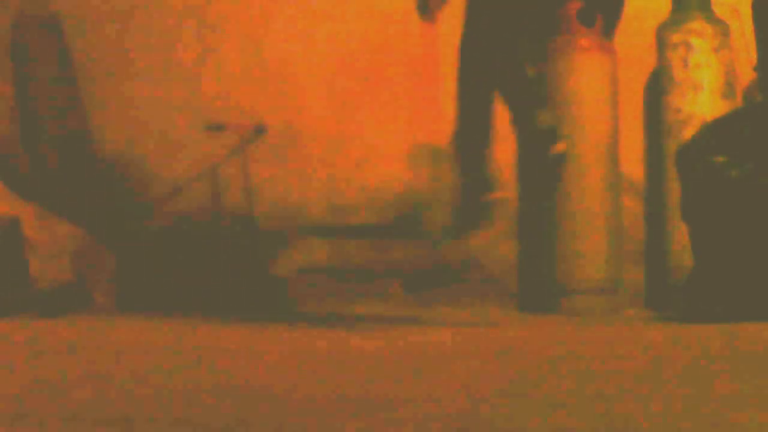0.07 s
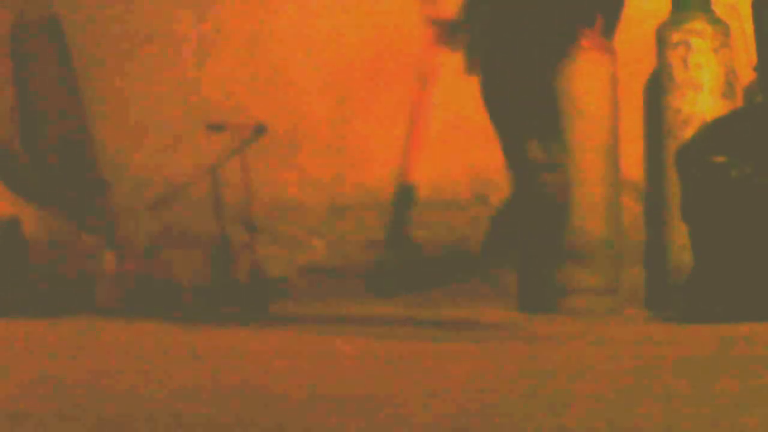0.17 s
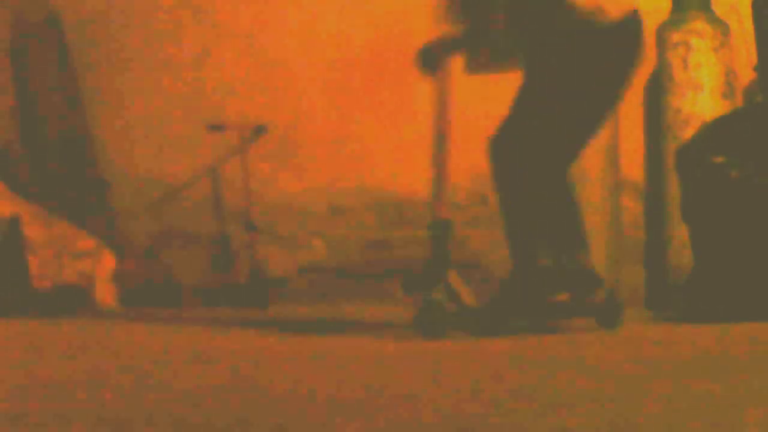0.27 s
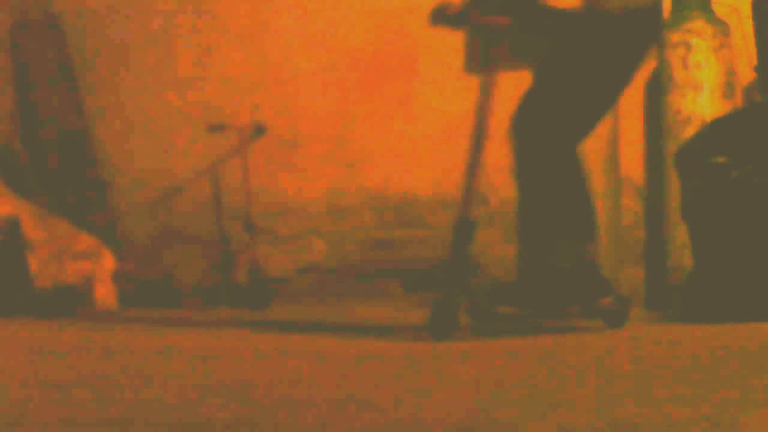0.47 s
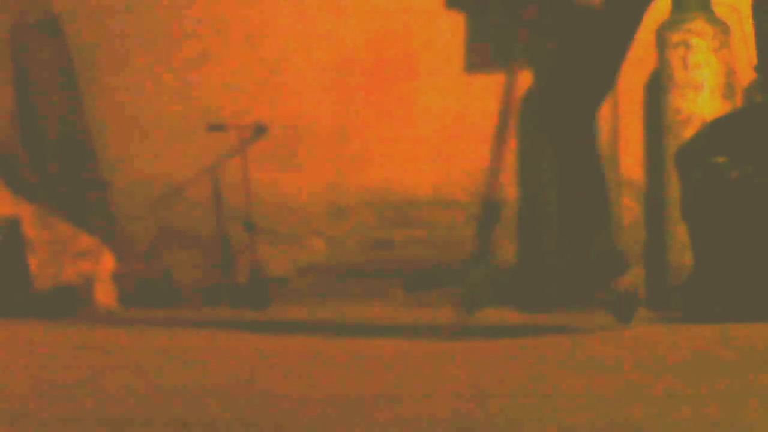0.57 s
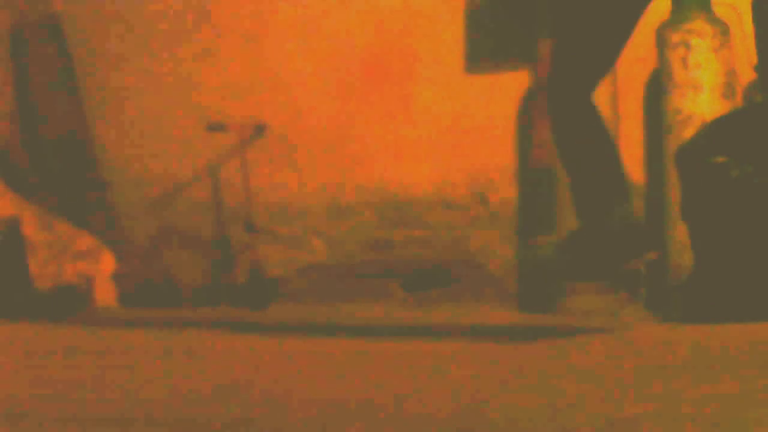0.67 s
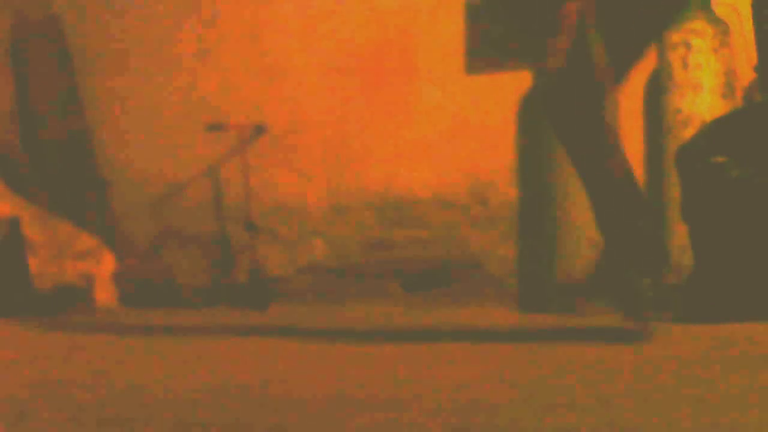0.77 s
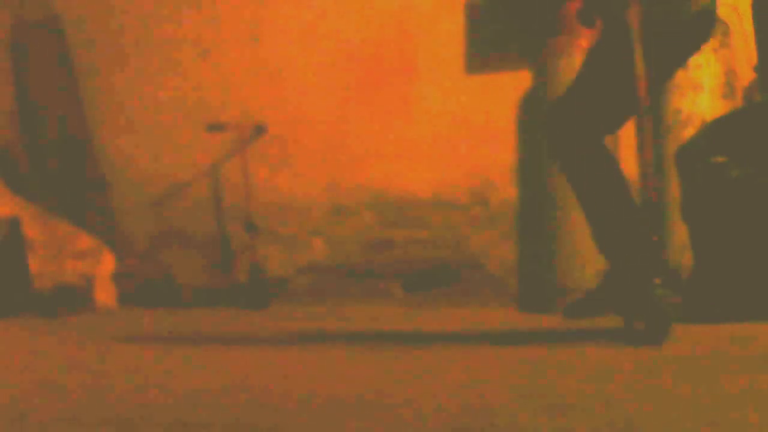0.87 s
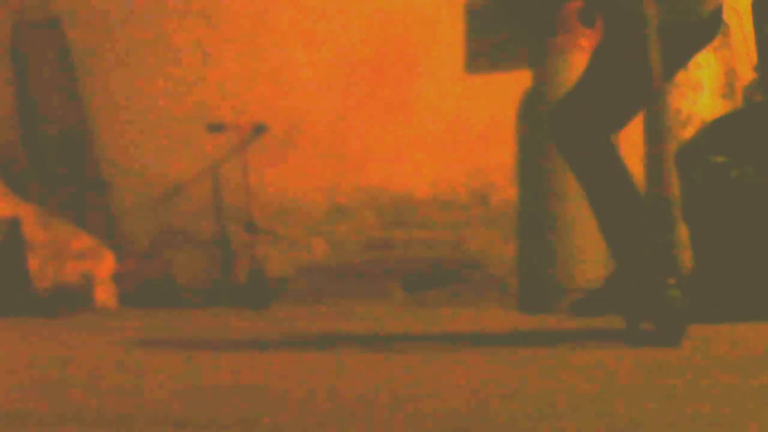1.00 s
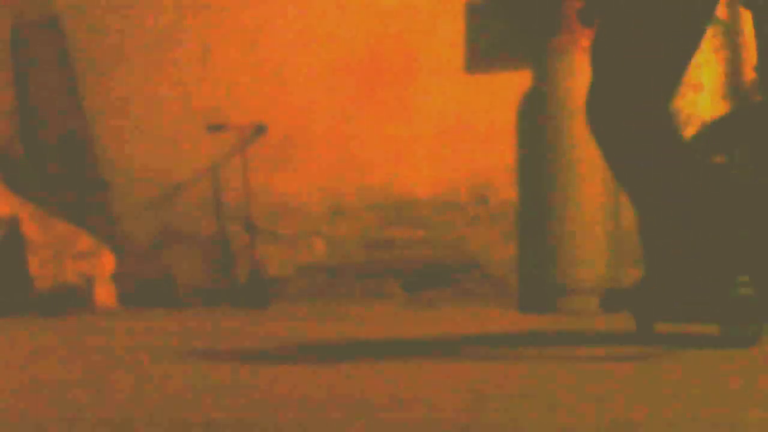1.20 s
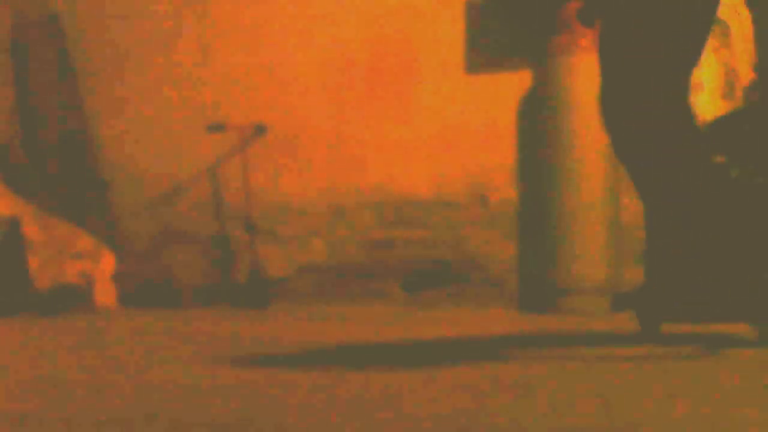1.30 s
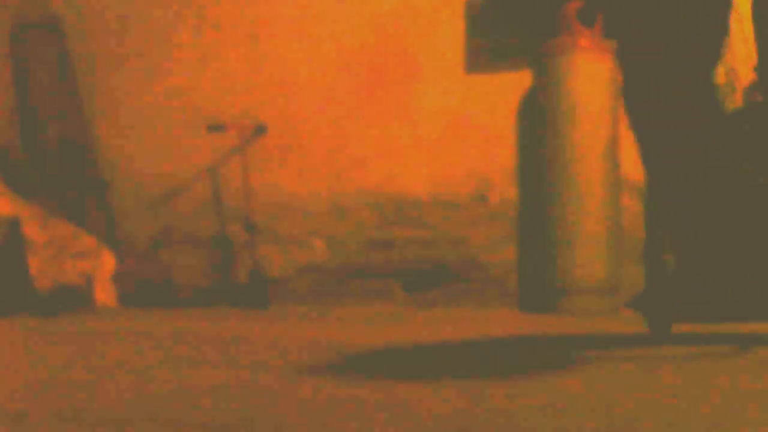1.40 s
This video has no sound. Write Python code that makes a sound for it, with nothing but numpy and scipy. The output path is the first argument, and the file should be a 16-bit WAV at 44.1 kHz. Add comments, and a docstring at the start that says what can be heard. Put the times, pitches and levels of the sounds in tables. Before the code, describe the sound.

Sharp smack of a scooter landing outdoors, followed by a dull thud and faint rolling.

```python
"""Kick scooter landing between walls

One wheel touches hard ground, then the deck slams down with a crack; half a second later comes a duller
thud. The impacts excite the scooter's damped modes, reverberate between the walls and leave a low boom.
The wheels roll on quietly. A hissy, narrow-band microphone overloads and clips on the crack."""
import sys
import numpy as np
from scipy import signal
from scipy.fft import rfft, irfft, next_fast_len
from scipy.io import wavfile
from scipy.ndimage import uniform_filter1d, map_coordinates

SR = 44100
rng = np.random.default_rng(int(sys.argv[2]) if len(sys.argv) > 2 else 0)


def persist_wave(psi):
    """Save psi, clipped to +-1, as 16-bit WAV."""
    counts = np.round(np.clip(psi, -1, 1) * 32767).astype(np.int16)
    wavfile.write(sys.argv[1], SR, np.atleast_2d(counts).T)


N = 63945
T = np.arange(N) / SR

# hard strikes and one quick echo of the main crack (at 0.248 s): t/s, level/dB, cutoff f/Hz
STRIKES_AND_ECHO = [(.2063, -15, 650), (0.2381, 0.5, 3980), (0.2396, -6.5, 1146), (.2478, -8.5, 880),
                    (.3758, -16, 850)]
# spectrum of a crack: f/Hz, relative level/dB
CRACK_SPECTRUM = [(60, -11.5), (200, -7), (700, 6), (1500, -7.5), (2450, 2.5), (3300, -24.5), (4300, -15.5),
                  (5550, -33), (6700, -24.5), (8200, -21.5)]
# heavily damped modes of wheel and deck: f/Hz, level/dB, T60/s
SMACK_MODES = [(334, -6.5, 0.021), (619, -5.5, 0.017), (913, -11, 0.035), (1883, -22.5, 0.015),
               (2260, -15.5, 0.0064)]
def cracks():
    """Impact radiation: each strike, and one quick echo, is a pulse, a damped smack and grit noise."""
    pulse_db, grit_db = -4, -17.5
    out = np.zeros(N)
    for start, db, cutoff in STRIKES_AND_ECHO:
        pulse = amp(pulse_db) * pressure_pulse(CRACK_SPECTRUM, cutoff)
        smack = sum(amp(level) * lowpass(hz, cutoff) * sine(hz) * decay(t60)
                    for hz, level, t60 in SMACK_MODES)
        grit = amp(grit_db) * steadied(noise(CRACK_SPECTRUM, cutoff), size=130) * decay(t60=0.012)
        out += at(start, amp(db) * (pulse + smack * rise(attack_s=0.0006) + grit))
    return out


# wheel and deck contacts: t/s, level/dB, cutoff f/Hz
LANDING_CONTACTS = [(0.2037, -25.5, 1700), (0.2376, -13, 3340), (.374, -33.5, 1000)]
# spectrum of their reverberation: f/Hz, relative level/dB
KNOCK_SPECTRUM = [(30, -19.5), (70, -11.5), (140, -4), (340, -3.5), (560, -5), (880, -11), (1200, -11.5),
                  (1750, -23.5), (2550, -26), (3200, -37), (7000, -38.5)]
def knocks():
    """Impulse response: touch, slam and rebound each excite the wall echoes and the scooter's modes."""
    ring_db = -4.5
    out = np.zeros(N)
    for start, db, cutoff in LANDING_CONTACTS:
        echo = reverberation(KNOCK_SPECTRUM, cutoff)
        ring = amp(ring_db) * ringing("knock", cutoff)
        out += at(start, amp(db) * (echo + ring))
    return out


# soft, heavy blows: t/s, echo level/dB, direct peak level/dB, cutoff f/Hz
SOFT_CONTACTS = [(0.7542, -28.5, -58, 450), (0.7628, -30.5, -16, 2200), (0.7711, -30.5, -11.5, 1300),
                 (.868, -42, -37.5, 730), (.917, -47, -38.5, 600)]
# spectrum of a thud: f/Hz, relative level/dB
THUD_SPECTRUM = [(30, -22), (90, 3.5), (130, -5), (200, -5.5), (290, -9.5), (370, -8), (500, -4),
                 (620, -16.5), (1050, -15.5), (1350, -26.5), (1700, -23.5), (2100, -45.5), (6000, -39)]
def thuds():
    """Temporal fusion: three close, soft contacts are heard as one thud; two faint bumps follow."""
    ring_start_s, ring_db = 0.766, -24.5  # the frame rings once the full weight is down
    out = np.zeros(N)
    for start, echo_db, direct_db, cutoff in SOFT_CONTACTS:
        echo = amp(echo_db) * reverberation(THUD_SPECTRUM, cutoff)
        direct = amp(direct_db) * pressure_pulse(THUD_SPECTRUM, cutoff)
        out += at(start, echo + direct)
    return out + at(ring_start_s, amp(ring_db) * ringing("thud"))


# the weight coming down: t/s, level/dB, f/Hz
WEIGHT_PUSHES = [(0.234, -12.5, 115.7), (0.7535, -20.5, 127)]
def pushes():
    """Damped oscillation: each heavy blow gives a low push that dies within a few cycles."""
    return sum(at(start, -amp(db) * sine(hz) * decay(t60=0.063)) for start, db, hz in WEIGHT_PUSHES)


# modes of scooter and ground: f/Hz, level in a knock/dB, level in a thud/dB, T60/s
SCOOTER_MODES = [(99, -26, -5, 1.32), (139, -4.5, -32.5, 0.17), (169.3, -2.5, -12.5, 0.53),
                 (205.6, -7, -10.5, 0.62), (247, -4, -20, 0.27), (280, -15, -13, 1.67),
                 (300, -11.5, 1, 0.29), (349, 1.5, -12, 0.38), (367.7, -20, -26.5, 1.85),
                 (441.6, -5, -12, 0.24), (501.7, -7.5, -11.5, 0.49), (534, 0.5, -8, 0.35),
                 (584, -9.5, -26, 0.15), (642.7, -10, -12.5, 0.53)]
def ringing(blow, cutoff=np.inf):
    """Modal superposition: the kind of blow weights each decaying mode; level and phase waver."""
    waver_db, waver_hz, waver_rad = 3.5, 8.7, 0.5
    out = np.zeros(N)
    for hz, knock_db, thud_db, t60 in SCOOTER_MODES:
        db = knock_db if blow == "knock" else thud_db
        gain = amp(db + waver_db * wobble(waver_hz)) * lowpass(hz, cutoff)
        phase = rng.uniform(0, 2 * np.pi) + waver_rad * wobble(waver_hz)
        out += gain * decay(t60) * sine(hz, phase)
    return out * rise(attack_s=0.0023)


# reverberation time between the walls: f/Hz, T60/s
WALL_DECAY = [(50, 1.5), (160, .7), (420, 0.44), (1100, 0.43), (2900, 0.33), (7000, .3)]
def reverberation(spectrum, cutoff):
    """Diffuse field: dense reflections merge into decaying noise in which the bass lasts longest."""
    reflections = steadied(noise(spectrum, cutoff), size=1100)
    hz, t, bands = signal.stft(reflections, SR, nperseg=512)
    absorption = np.exp(-np.log(1000) * t / along(WALL_DECAY, hz)[:, None])
    _, tail = signal.istft(bands * absorption, SR, nperseg=512)
    return tail[:N] * rise(attack_s=0.00076)


# onsets of the boom: t/s, level/dB
BOOM_ONSETS = [(0.24, -31.5), (0.755, -38)]
def booms():
    """Standing wave: each heavy blow excites a low mode of the air between the walls."""
    boom = sine(hz=37) * decay(t60=1.5) * rise(attack_s=0.025)
    return sum(at(start, amp(db) * boom) for start, db in BOOM_ONSETS)


# envelope of the rolling: t/s, level/dB
ROLL_ENVELOPE = [(0, -42), (.2, -37), (.3, -49.5), (.55, -35.5), (.7, -38), (.93, -31), (.99, -50),
                 (1.17, -50.5), (1.29, -35), (1.38, -50), (1.45, -36.5)]
# spectrum of the wheels: f/Hz, relative level/dB
ROLL_SPECTRUM = [(25, 17), (50, -1), (90, -5), (140, -1.5), (200, -17), (290, -9), (360, -11.5),
                 (470, -8.5), (700, -20), (1200, -27), (3000, -42)]
def rolling():
    """Roughness excitation: small wheels rumble unevenly over the ground."""
    rough_db = 1
    rumble = noise(ROLL_SPECTRUM)
    level_db = np.interp(T, *np.transpose(ROLL_ENVELOPE))
    return rumble * amp(level_db + rough_db * wobble(rate_hz=21.1))


# spectrum of the distant background: f/Hz, relative level/dB
AMBIENT_SPECTRUM = [(25, 14.5), (60, -16.5), (105, 2.5), (150, -4), (300, 2.5), (480, -7.5), (650, -7),
                    (850, -15.5), (1300, -16.5), (3000, -41)]
def background():
    """Ambient noise: a faint, stationary floor, strongest in the bass."""
    return amp(db=-50.5) * noise(AMBIENT_SPECTRUM)


def pressure_pulse(spectrum, cutoff, size=4096):
    """Minimum phase: folding the cepstrum packs the energy at the onset of a pulse of peak 1."""
    hz = np.fft.rfftfreq(size, 1 / SR)
    magnitude = amp(along(spectrum, hz)) * lowpass(hz, cutoff)
    cepstrum = irfft(np.log(magnitude))
    folded = 2 * cepstrum * (np.arange(size) < size // 2)
    pulse = irfft(np.exp(rfft(folded)))
    return np.pad(pulse / np.abs(pulse).max(), (0, N - size))


def noise(spectrum, cutoff=np.inf):
    """Spectral shaping: filtered white noise, scaled to rms 1."""
    white = rng.standard_normal(N)
    x = filtered(white, lambda hz: amp(along(spectrum, hz)) * lowpass(hz, cutoff))
    return x / np.sqrt(np.mean(x ** 2) + 1e-20)


def filtered(x, response):
    """Convolution theorem: filtering multiplies the spectrum by a frequency response."""
    size = next_fast_len(N + SR // 2)
    hz = np.fft.rfftfreq(size, 1 / SR)
    return irfft(rfft(x, size) * response(hz), size)[:N]


def lowpass(hz, cutoff):
    """Contact compliance: a soft contact passes little treble."""
    return 1 / np.sqrt(1 + (hz / cutoff) ** 4)


def steadied(x, size):
    """Normalisation by the running rms over size samples."""
    return x / np.sqrt(np.abs(uniform_filter1d(x ** 2, size)) + 1e-9)


def wobble(rate_hz):
    """Random modulation: a spline through Gaussian values."""
    return map_coordinates(rng.standard_normal(200), [T * rate_hz], mode="mirror")


def along(points, hz):
    """Interpolation on a logarithmic frequency axis."""
    freqs, values = np.transpose(points)
    return np.interp(np.log(hz + 1), np.log(freqs + 1), values)


def amp(db):
    """Decibels to amplitude ratio."""
    return 10 ** (np.asarray(db) / 20)


def sine(hz, phase=0):
    """Simple harmonic motion."""
    return np.sin(2 * np.pi * hz * T + phase)


def decay(t60):
    """Exponential decay, 60 dB in t60 seconds."""
    return np.exp(-np.log(1000) * T / t60)


def rise(attack_s):
    """First-order onset."""
    return 1 - np.exp(-T / attack_s)


def at(start, x):
    """Delay by start seconds."""
    return np.pad(x, (round(start * SR), 0))[:N]


def scene():
    """Linear superposition: all sources add in one channel."""
    return (knocks() + thuds() + cracks() + pushes() + booms() + rolling() + background())[None]


# spectrum of the microphone's hiss: f/Hz, relative level/dB
HISS_SPECTRUM = [(100, 11.5), (1000, -0.5), (2500, -1), (5000, -2), (7800, -2), (8200, -15), (8600, -50.5)]
def record(dry):
    """Saturation: a narrow-band input with hiss and a faint whine clips on the crack."""
    band_hz, distortion_top_hz = 8350, 16600
    ceiling, knee = 0.71, 14
    hiss = amp(db=-49.5) * noise(HISS_SPECTRUM)
    whine = amp(db=-73) * np.sqrt(2) * sine(hz=8000)
    narrow = filtered(dry[0] + hiss + whine, lambda hz: hz < band_hz)
    clipped = narrow / (1 + np.abs(narrow / ceiling) ** knee) ** (1 / knee)
    return filtered(clipped, lambda hz: hz < distortion_top_hz)[None]


dry = scene()
out = record(dry)
persist_wave(out)
```